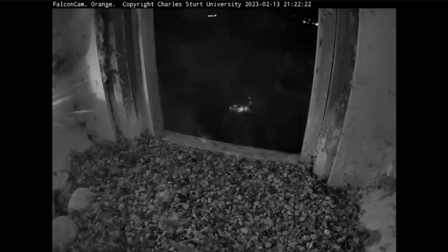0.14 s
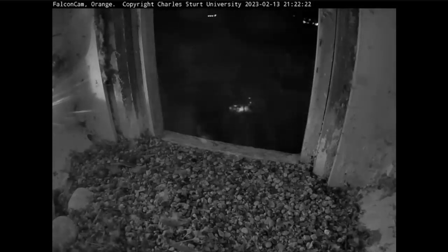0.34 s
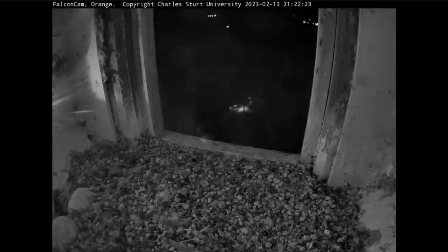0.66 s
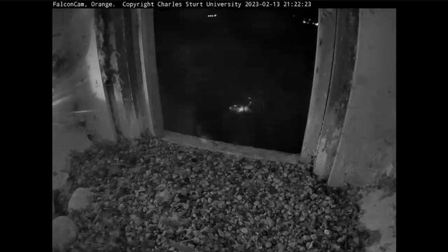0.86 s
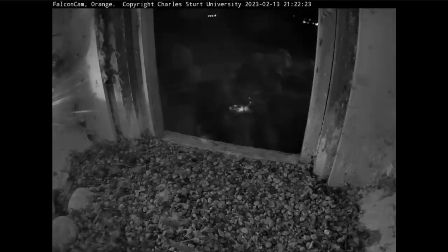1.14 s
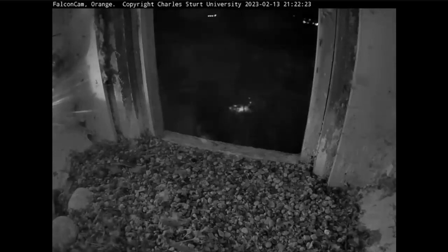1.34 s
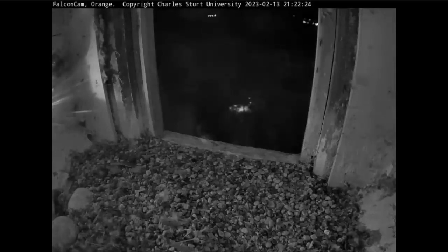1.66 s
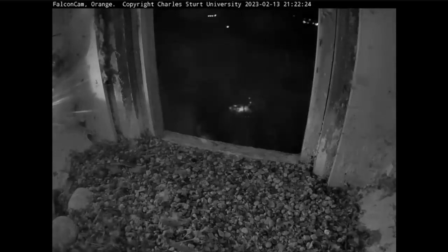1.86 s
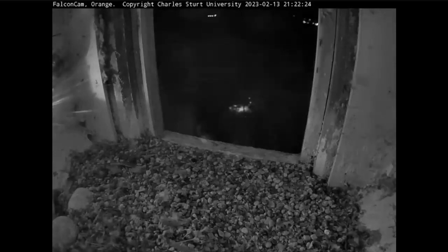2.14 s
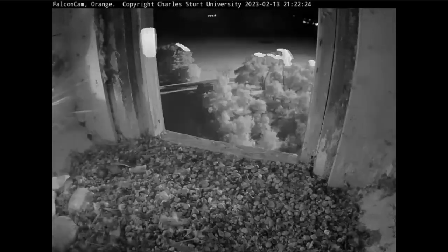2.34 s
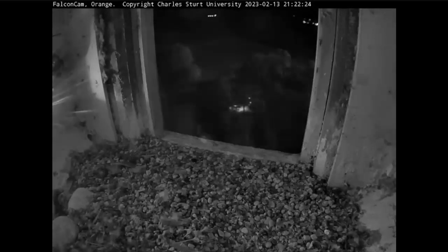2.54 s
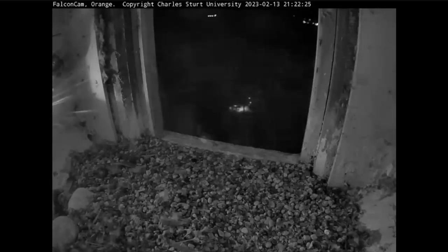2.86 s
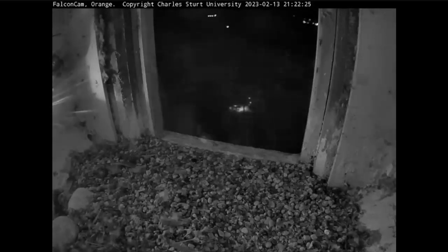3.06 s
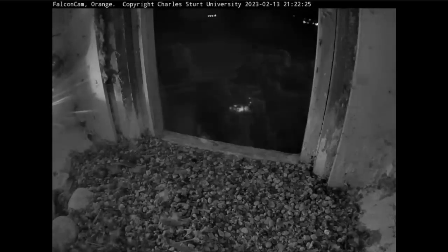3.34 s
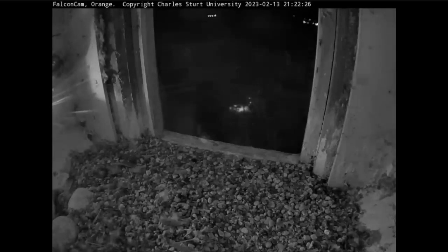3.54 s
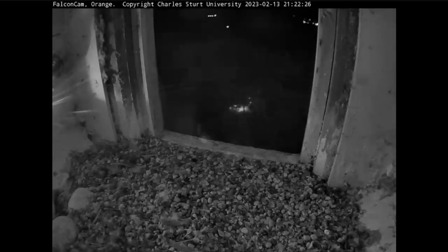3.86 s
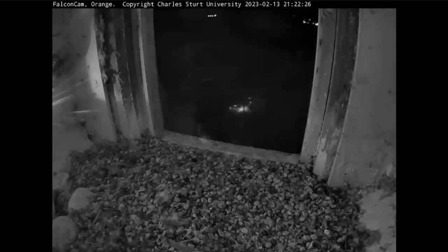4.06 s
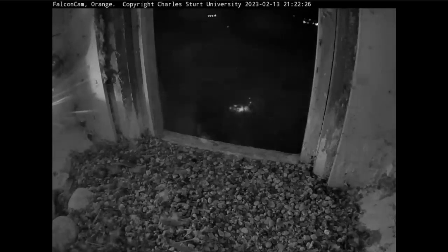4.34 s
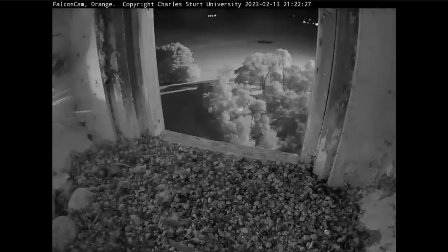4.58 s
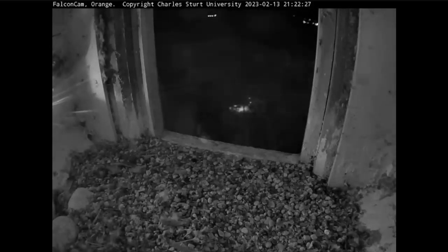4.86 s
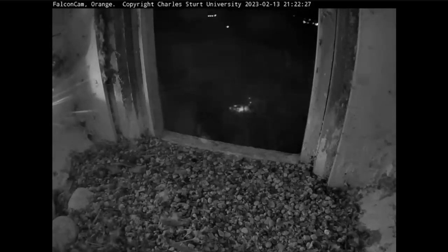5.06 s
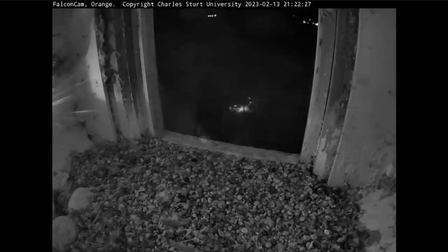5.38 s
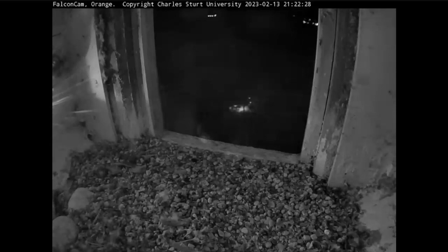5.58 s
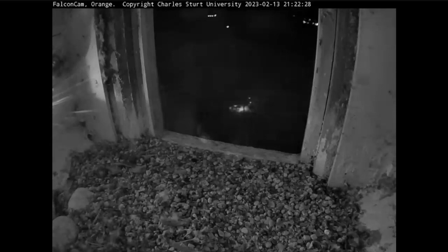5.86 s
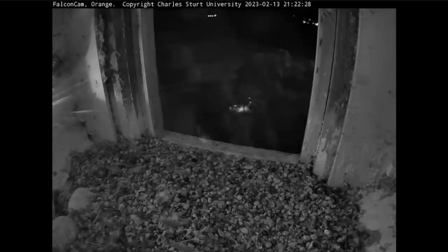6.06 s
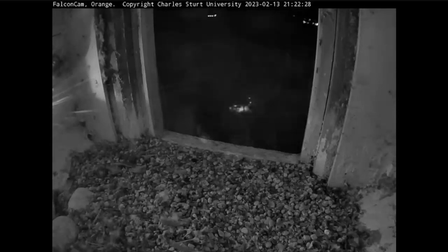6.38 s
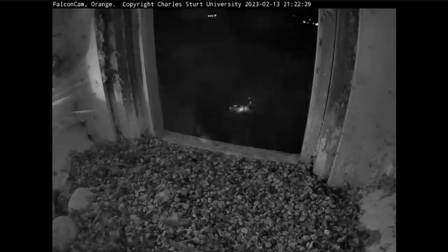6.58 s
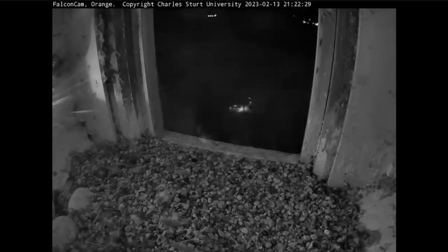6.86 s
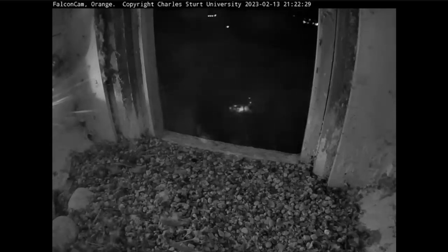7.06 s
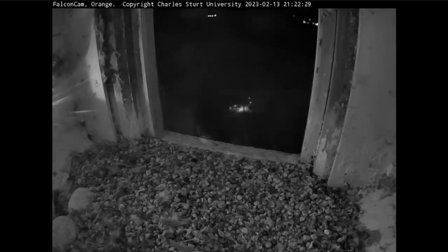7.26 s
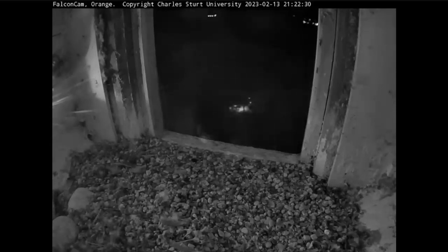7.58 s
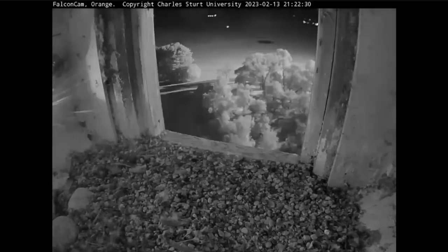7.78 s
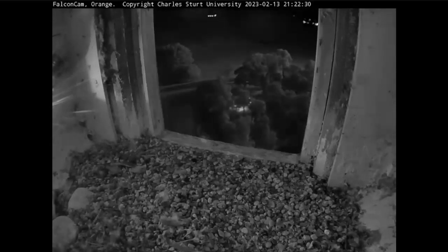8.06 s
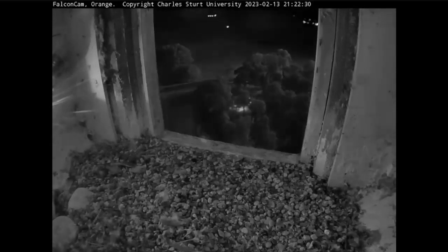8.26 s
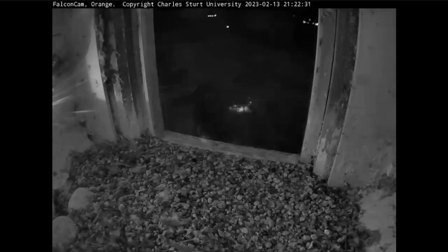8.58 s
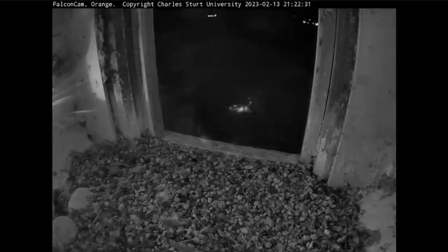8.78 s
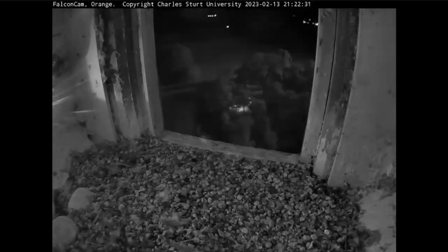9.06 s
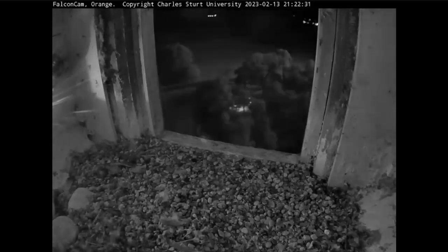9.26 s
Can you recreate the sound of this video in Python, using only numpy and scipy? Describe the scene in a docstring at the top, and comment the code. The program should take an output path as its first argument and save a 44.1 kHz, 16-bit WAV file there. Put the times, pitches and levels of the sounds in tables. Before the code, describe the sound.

Over a steady, low town hum with faint microphone hiss, a sharp explosion cracks after half a second, distorting and ringing hollowly inside a wooden box. Six more similar blasts follow at uneven gaps, each with rapid echoes and a long bassy tail that overlaps the next. Small muffled thumps and knocks pop between them, without any roll of their own.

```python
"""Firecrackers at night, heard from inside a nest box high on a tower. A low hum (wandering sines), town noise
and microphone hiss (shaped noise) run throughout. From half a second in, seven blasts ring the box modes near
200 Hz and clip the microphone input; each cracks, slaps back off buildings and dies away in a long roll of
decaying noise. Six smaller pops, thump and knock without roll, fall in between."""
import sys
import numpy as np
from scipy import signal
from scipy.fft import rfft, irfft, next_fast_len
from scipy.io import wavfile

SR = 44100
rng = np.random.default_rng(int(sys.argv[2]) if len(sys.argv) > 2 else 0)


def unload_wav(signal):
    """Save mono or channel-first audio to the path in sys.argv[1] as 16-bit WAV at rate SR, clipped to [-1, 1]."""
    wavfile.write(
        sys.argv[1],
        SR,
        np.round(np.clip(np.atleast_2d(signal).T, -1, 1) * 32767).astype(np.int16),
    )


N = 415951

# narrow resonances of the microphone housing: (frequency [Hz], width [Hz], level [dB])
HOUSING_MODES = [(1220, 101.5, 24.5), (1359, 115, 23), (1658, 93, 22.5), (2480, 82, 18), (2755, 160, 13.5),
                 (3112, 95, 17.5), (4840, 200, -1.5), (5960, 260, 0.5)]


def from_db(db):
    """Decibels to amplitude gain."""
    return 10 ** (np.asarray(db) / 20)


def at_hz(points, hz):
    """Interpolate a table on a log-frequency axis."""
    points = np.array(points)
    return np.interp(np.log(np.maximum(hz, 1)), np.log(points[:, 0]), points[:, 1])


def drift(per_s):
    """Random values, per_s of them a second, joined by straight lines."""
    return np.interp(np.arange(N) / SR * per_s, np.arange(N), rng.standard_normal(N))


def low_pass(x, hz, order):
    """Butterworth low-pass."""
    sos = signal.butter(order, min(hz, .45 * SR), fs=SR, output="sos")
    return signal.sosfilt(sos, x + 1e-18)   # tiny offset avoids denormals


def impulses(times_s, levels_db):
    """One single-sample click for each time."""
    out = np.zeros(N)
    index = np.clip(np.round(np.asarray(times_s) * SR).astype(int), 0, N - 1)
    np.add.at(out, index, from_db(levels_db))
    return out


def convolve(x, response):
    """Play a signal through an impulse response."""
    return signal.fftconvolve(x, response)[:N]


def housing_gain(hz):
    """Gain of the microphone housing: steep peaks on a flat response."""
    peaks = 0
    for centre_hz, width_hz, db in HOUSING_MODES:
        peaks = peaks + from_db(db) / (1 + ((hz - centre_hz) / width_hz) ** 2) ** 2
    return 1 + peaks


def noise(spectrum, size, colour=np.ones_like):
    """Gaussian noise with a density table in dB per Hz and a further gain over frequency."""
    padded = next_fast_len(size, real=True)
    hz = np.fft.rfftfreq(padded, 1 / SR)
    shaped = rfft(rng.standard_normal(padded)) * from_db(at_hz(spectrum, hz)) * colour(hz)
    return irfft(shaped, padded)[:size] * np.sqrt(SR / 2)   # white noise to unit power per Hz


def hum(wander_hz=.25, wander_per_s=0.98):
    """Steady low tones at nearby frequencies, each wandering slightly in pitch."""
    # steady tones: (frequency [Hz], rms level [dB])
    tones = [(38, -72.5), (50, -61.5), (60.3, -59.5), (68.8, -61)]
    out = np.zeros(N)
    for hz, db in tones:
        cycles = np.cumsum(hz + wander_hz * drift(wander_per_s)) / SR + rng.random()
        out += from_db(db) * np.sqrt(2) * np.sin(2 * np.pi * cycles)
    return out


def town():
    """Steady low noise of the town, coloured by the microphone housing."""
    # density ahead of the housing: (frequency [Hz], level [dB per Hz])
    town_density = [(22, -104), (36, -86), (55, -79.5), (84, -89), (110, -77), (150, -84.5), (200, -70.5),
                    (260, -82.5), (360, -105), (560, -116), (800, -131), (1500, -142), (5000, -150)]
    return noise(town_density, N, housing_gain)


def hiss():
    """Steady noise of the microphone itself."""
    # density: (frequency [Hz], level [dB per Hz])
    hiss_density = [(500, -134), (3800, -135), (4700, -130), (5200, -132), (6300, -128), (7000, -133)]
    return noise(hiss_density, N)


def with_suction(clicks, after_s=.0023, share=.5):
    """A far blast is a push followed by a pull: an inverted, delayed copy."""
    pull = np.interp(np.arange(N) - np.round(after_s * SR), np.arange(N), clicks, left=0)
    return clicks - share * pull


def boom(clicks, blast_hz, front_hz, order):
    """A pressure pulse, its front rounded by the way it has come, sets the box modes ringing."""
    # air and panel modes ahead of the pulse filters: (frequency [Hz], level [dB], t60 [s])
    box_modes = [(59.75, -19, 0.56), (86.5, -14, 0.067), (204.14, 1.94, 0.075), (214, -10.5, 0.0091),
                 (326, -4, 0.018)]
    # reflections close to the box: (delay [s], level [dB])
    near_walls = [(0, 0.5), (.00815, -5.5), (0.0103, -10)]
    t = np.arange(SR // 2) / SR
    ringing = sum(from_db(db - 60 * t / t60) * np.cos(2 * np.pi * hz * t) for hz, db, t60 in box_modes)
    pulse = low_pass(low_pass(ringing, blast_hz, order=1), blast_hz, order=1)
    reflections = impulses(*np.transpose(near_walls))[:len(t)]
    response = convolve(reflections, low_pass(pulse, front_hz, order=order))
    return convolve(clicks, response[:SR])


def crack(clicks, air_hz, knock_db, snap_t60, scatter_t60, scatter_db, rise_s=0.00055):
    """The sharp front knocks on the housing, then rattles round the box; the air dulls it with distance."""
    # density of the rattle ahead of the housing, also weights the knock: (frequency [Hz], level [dB per Hz])
    crack_density = [(300, -85), (550, -83.5), (850, -89), (1300, -88), (2000, -99), (2600, -99),
                     (4400, -90), (6600, -96.5)]
    t = np.arange(SR) / SR
    knock = np.zeros(SR)
    for k, (hz, width_hz, db) in enumerate(HOUSING_MODES):
        age = np.pi * width_hz * t   # narrow resonances swell and fade more slowly
        swell = age * np.exp(1 - age)
        level = from_db(knock_db + db + at_hz(crack_density, hz))
        knock += (-1) ** k * level * np.sin(2 * np.pi * hz * t) * swell
    power = from_db(-60 * t / snap_t60) ** 2 + from_db(scatter_db - 60 * t / scatter_t60) ** 2
    power = power * (1 - np.exp(-(t / rise_s) ** 2))
    envelope = np.sqrt(np.maximum(convolve(clicks ** 2, power), 0))
    rattle = envelope * noise(crack_density, N, housing_gain)
    return low_pass(convolve(clicks, knock) + rattle, air_hz, order=1)


def roll(clicks, build_s=0.045, lumpy_db=1.5, lumps_per_s=35):
    """Countless far echoes as noise: builds up, dies away unevenly, the bass lasting longest."""
    # density ahead of the housing and the decay: (frequency [Hz], level [dB per Hz])
    roll_density = [(20, -82.5), (42, -61), (58, -50), (85, -65.5), (145, -66), (180, -60), (205, -51.5),
                    (230, -60.5), (270, -64), (320, -72), (400, -89.5), (580, -94.5), (820, -113),
                    (2000, -122), (4000, -115), (6600, -118)]
    # decay: (frequency [Hz], t60 [s])
    roll_decay = [(60, 3.83), (200, 3.54), (550, 2.55), (1300, 2.58), (2800, 2.04), (6000, 1.4)]
    t = np.arange(3 * SR) / SR
    size = next_fast_len(N, real=True)
    hz = np.fft.rfftfreq(size, 1 / SR)
    wash = rfft(noise(roll_density, size, housing_gain))
    out = np.zeros(N)
    centres_hz, t60s = np.transpose(roll_decay)
    # overlapping bands that sum to the whole wash
    for share, t60 in zip(np.eye(len(centres_hz)), t60s):
        band = irfft(wash * at_hz(np.c_[centres_hz, share], hz), size)[:N]
        decay = (1 - np.exp(-(t / build_s) ** 2)) * from_db(-60 * t / t60)
        out += band * np.sqrt(np.maximum(convolve(clicks ** 2, decay ** 2), 0))
    return out * from_db(lumpy_db * drift(lumps_per_s))


def bangs(sound_m_per_s=343):
    """Like charges at slightly different spots arrive directly, off the buildings, and as a long roll."""
    # big bangs: (time [s], offset of the burst from the usual spot [m], crack level [dB])
    blasts = [(.4831, -1.3, -.5), (1.675, -.62, .5), (2.963, .17, 1.5), (3.7203, .04, .5), (5.1548, .7, 0),
              (6.5394, .42, -1), (8.3894, -.09, -.5)]
    # off buildings: (delay from the usual spot [s], extra path per offset [m/m], thump [dB], crack [dB])
    echo_paths = [(0.0527, .74, -12, -9), (0.0679, 1.37, -19, -19.5), (.0789, 1.59, -17.5, -16.5),
                  (0.0963, 1.93, -13.5, -24)]
    at_s, offset_m, crack_level_db = np.transpose(blasts)
    direct = impulses(at_s, 0)
    bodies, fronts = 0, 0
    for delay_s, path_per_m, thump_db, front_db in echo_paths:
        arrivals_s = at_s + delay_s + path_per_m * offset_m / sound_m_per_s
        bodies = bodies + impulses(arrivals_s, thump_db)
        fronts = fronts + impulses(arrivals_s, front_db + crack_level_db)
    thump = boom(direct, blast_hz=197.4, front_hz=393, order=2)
    snap = crack(impulses(at_s, crack_level_db), air_hz=14000, knock_db=24.0,
                 snap_t60=0.082, scatter_t60=0.85, scatter_db=-21)
    echoes = boom(with_suction(bodies, share=1.196), blast_hz=120.8, front_hz=335, order=4)
    slaps = crack(fronts, air_hz=5000, knock_db=22.5, snap_t60=0.021, scatter_t60=0.45, scatter_db=-11.5)
    return thump + snap + echoes + slaps + roll(direct)


def pops():
    """Small crackers: a dull thump and a knock, without roll."""
    # small pops: (time [s], thump level [dB], crack level [dB])
    small_pops = [(0.8836, -22.5, -19), (1.8478, -33, -26.5), (2.0979, -20, -19.5), (4.7523, -26.5, -15.5),
                  (6.7432, -23.5, -13.5), (7.7341, -23.5, -21)]
    at_s, thump_db, crack_db = np.transpose(small_pops)
    pushes = with_suction(impulses(at_s, thump_db), share=.8)
    thumps = boom(pushes, blast_hz=168, front_hz=305, order=4)
    knocks = crack(impulses(at_s, crack_db), air_hz=1900, knock_db=27,
                   snap_t60=0.05, scatter_t60=0.33, scatter_db=-7.5, rise_s=.002)
    return thumps + knocks


def scene():
    """Crackers over a low hum, the town's noise and the microphone's hiss, one channel."""
    return (hum() + town() + hiss() + bangs() + pops())[None]


def record(dry):
    """A dull microphone drives its input stage into hard clipping; the converter adds faint noise."""
    mic_top_hz, cutoff_hz = 7030, 16000
    clip_level, bias, converter_rms_db = 0.1143, .0025, -99
    clipped = np.clip(low_pass(dry, mic_top_hz, order=20), -clip_level - bias, clip_level - bias)
    out = clipped + from_db(converter_rms_db) * rng.standard_normal(dry.shape)
    return low_pass(out, cutoff_hz, order=20) + bias


dry = scene()
out = record(dry)
unload_wav(out)
```